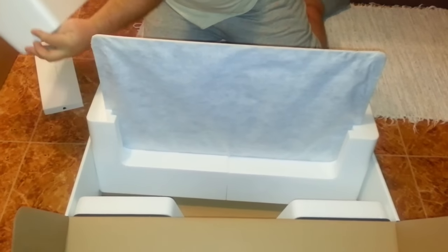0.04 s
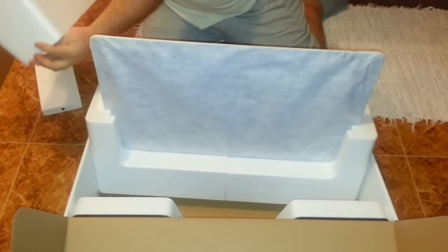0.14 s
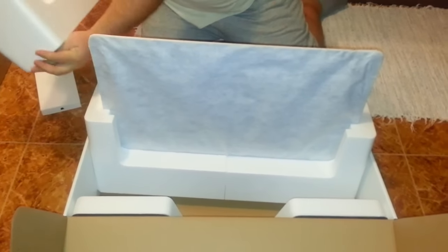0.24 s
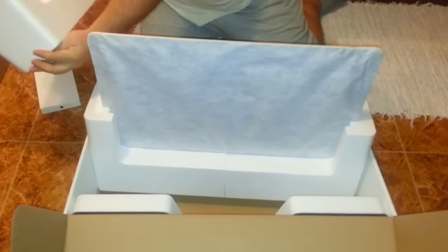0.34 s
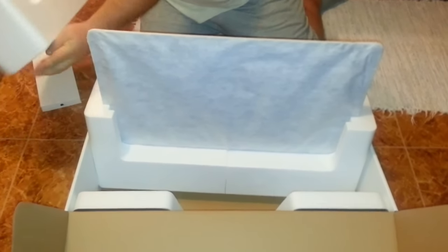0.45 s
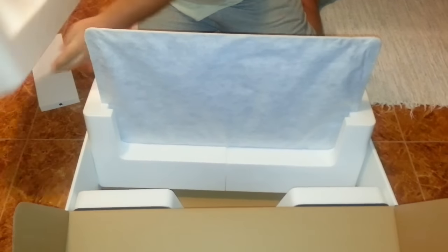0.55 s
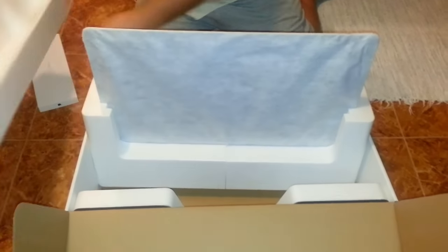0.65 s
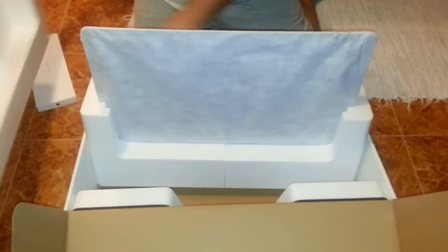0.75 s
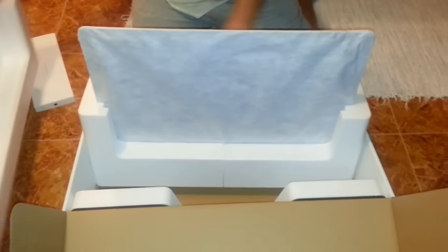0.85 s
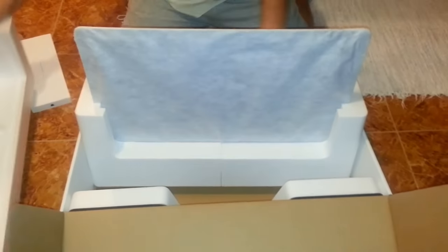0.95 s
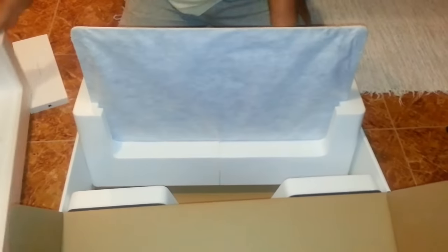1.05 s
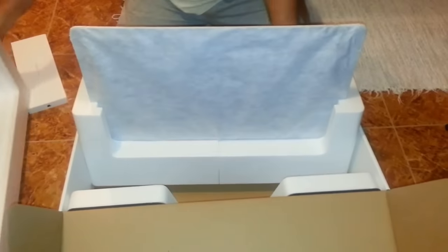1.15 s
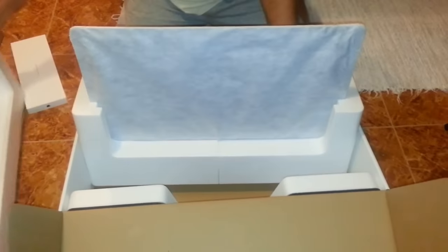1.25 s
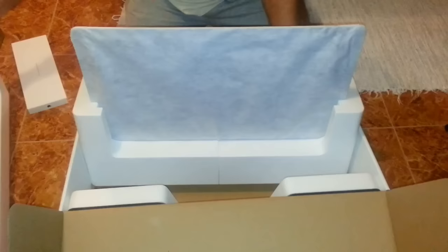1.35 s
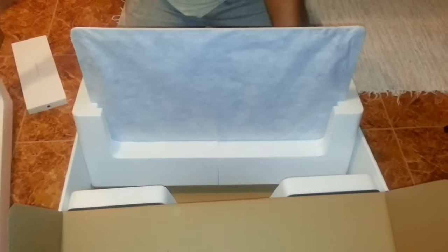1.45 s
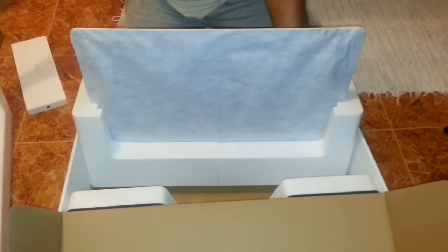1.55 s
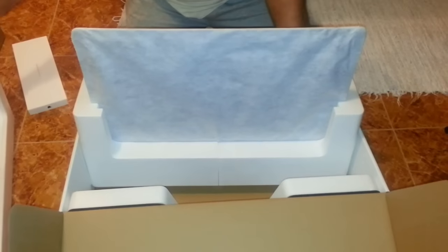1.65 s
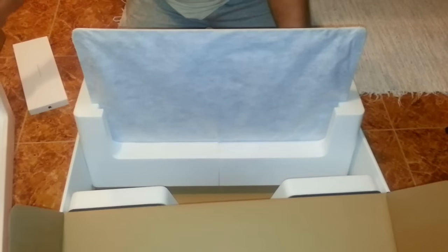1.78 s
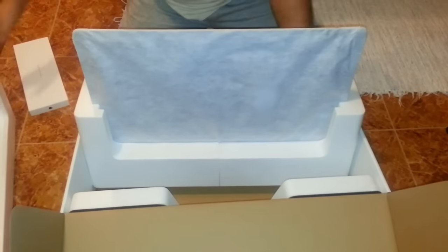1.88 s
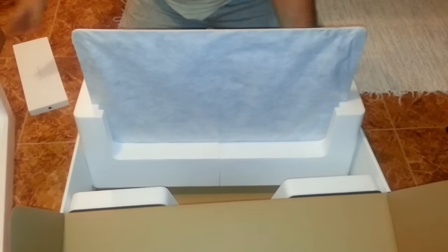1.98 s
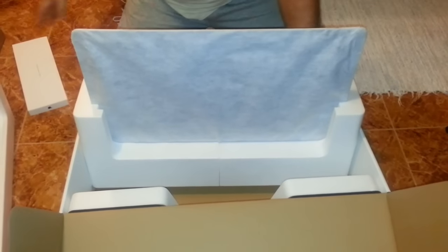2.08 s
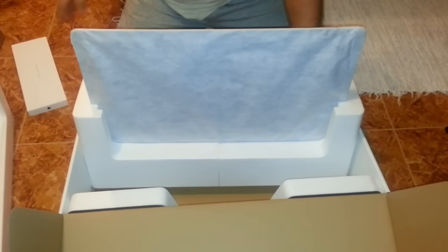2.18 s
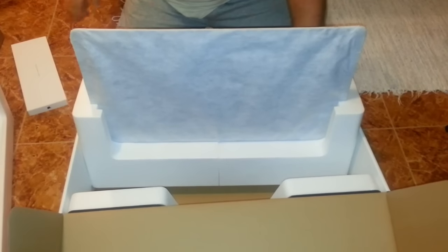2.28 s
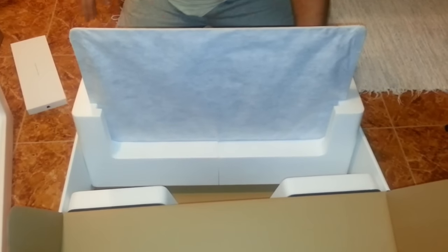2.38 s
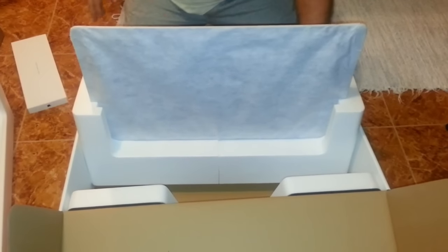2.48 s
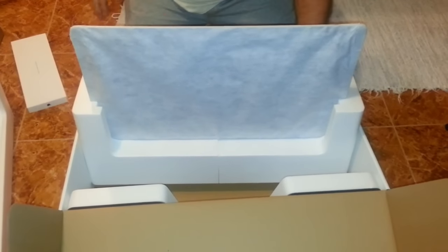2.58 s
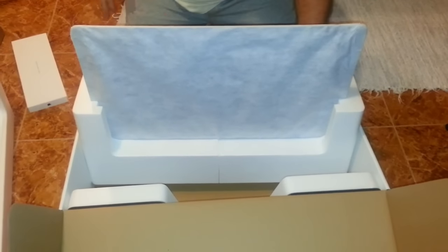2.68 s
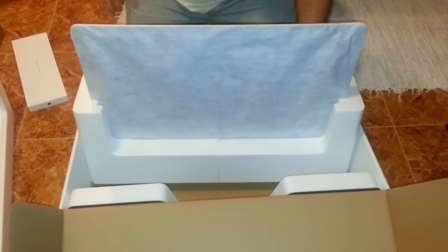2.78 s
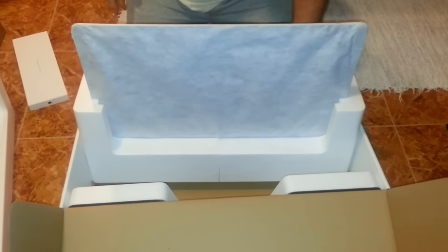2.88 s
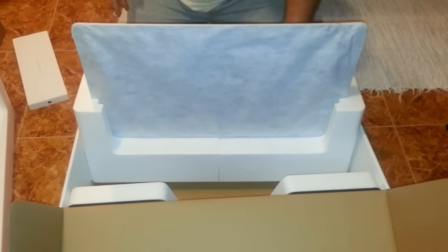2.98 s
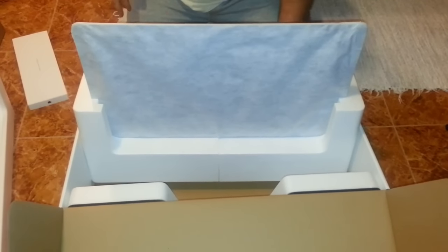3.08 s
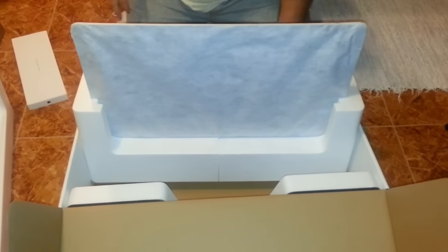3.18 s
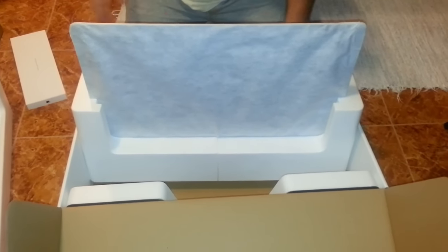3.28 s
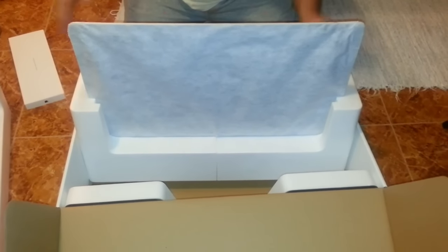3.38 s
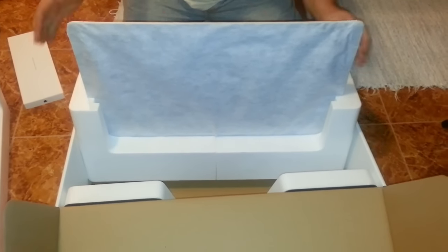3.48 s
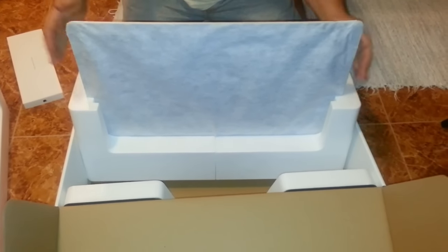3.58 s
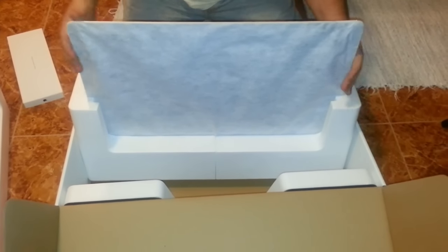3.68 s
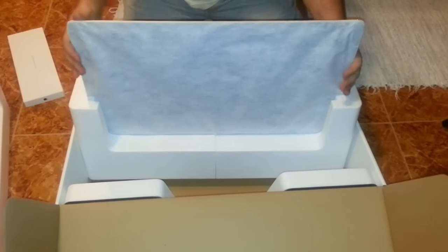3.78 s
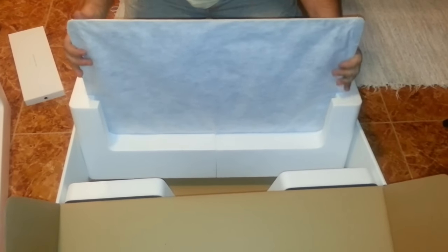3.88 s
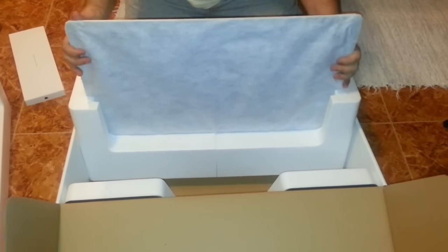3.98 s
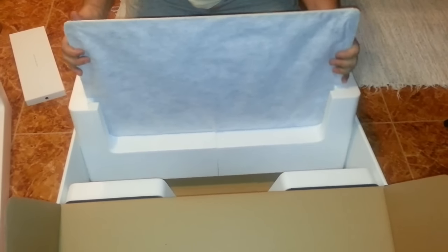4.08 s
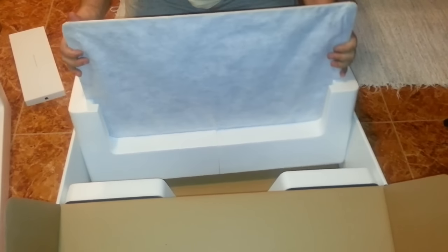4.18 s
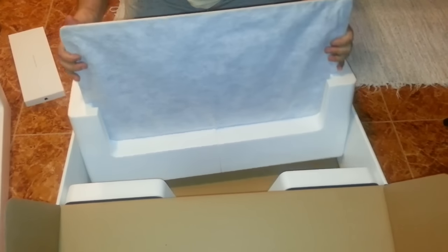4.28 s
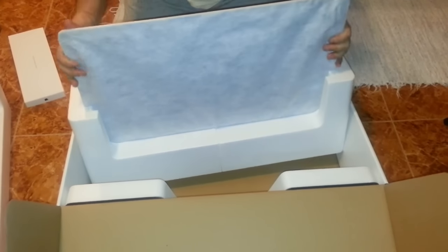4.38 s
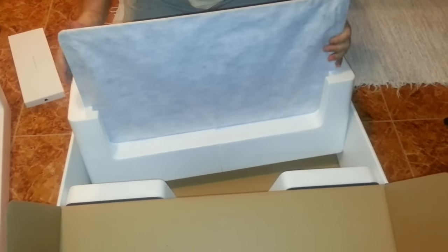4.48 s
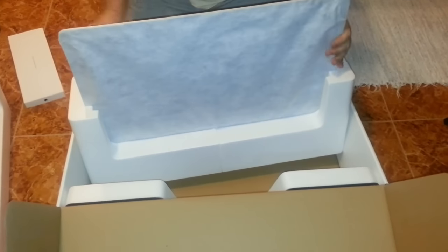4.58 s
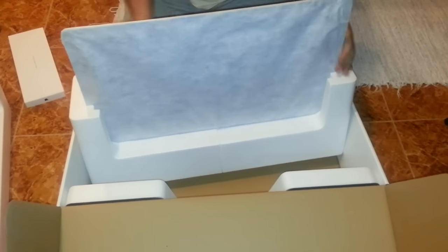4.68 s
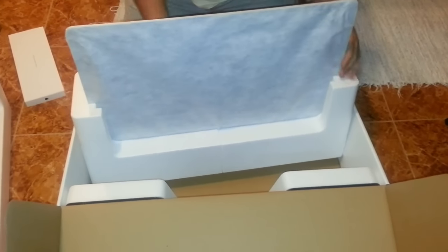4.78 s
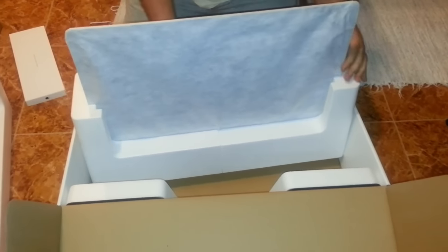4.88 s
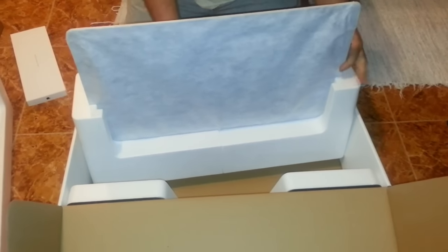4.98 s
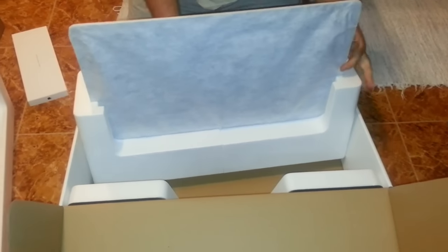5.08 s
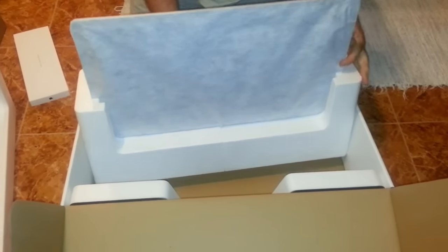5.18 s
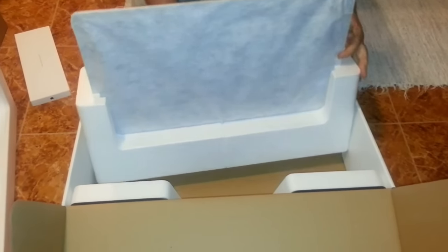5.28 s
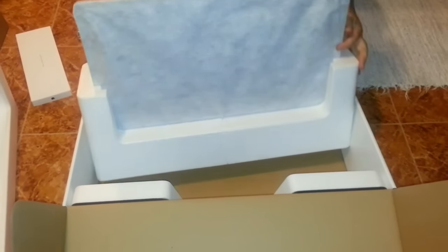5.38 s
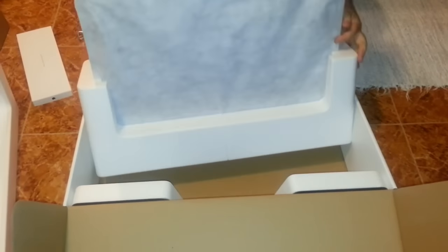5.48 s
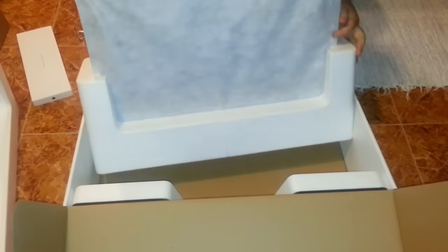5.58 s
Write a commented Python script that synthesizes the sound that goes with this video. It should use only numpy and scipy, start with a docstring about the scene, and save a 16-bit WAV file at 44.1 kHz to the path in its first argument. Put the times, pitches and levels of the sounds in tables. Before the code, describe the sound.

Close handling of packing foam indoors: soft skin scuffs, snapping crackles, a heavy low double knock and a few smaller bumps, then nearly three quiet seconds of light finger rustles and taps. Finally foam rubs on foam, rasping and squealing with two main rough pulls. Short hard-room reflections and a very faint steady background; the left channel is sharper, the right muffled.

```python
"""Unpacking foam from a cardboard box.

In a small tiled room a loose foam piece slides through the hands: scuffed grains over ringing modes.
It crackles in noise bursts and knocks hollowly as damped modes; fingers scrape, brush and tap.
Then the next piece is pulled up: grains drag through a resonant wall, and stick-slip harmonics squeal
and squeak. Reflections from the room and a faint steady background surround it."""
import sys
import numpy as np
from scipy import signal
from scipy.fft import rfft, irfft, next_fast_len
from scipy.io import wavfile
from scipy.ndimage import uniform_filter1d

SR = 44100
rng = np.random.default_rng(int(sys.argv[2]) if len(sys.argv) > 2 else 0)


def waveform_to_disk(signal):
    """Save audio, clipped to [-1, 1], as 16-bit WAV at the path in sys.argv[1]."""
    frames = np.transpose(np.atleast_2d(signal))
    scaled = np.clip(frames, -1, 1) * 32767
    samples = np.round(scaled).astype(np.int16)
    wavfile.write(sys.argv[1], SR, samples)


N = 248988
TIME = np.arange(N) / SR  # s


def amp(db):
    """Decibels to gain."""
    return 10 ** (np.asarray(db) / 20)


def unit(x):
    """Scales to rms 1."""
    return x / np.sqrt(np.mean(x ** 2) + 1e-20)


def read(points, hz):
    """Reads a table on a log-frequency axis."""
    f, value = np.transpose(points)
    return np.interp(np.log(hz + 1), np.log(f + 1), value)


def add(mix, start_s, sound):
    """Mixes a sound in at its start time."""
    part = mix[max(round(start_s * SR), 0):][:len(sound)]
    part += sound[:len(part)]


def play(source, rows):
    """Plays every row of a table."""
    mix = np.zeros(N)
    for row in rows:
        add(mix, *source(*row))
    return mix


def colour(x, points, size=4096):
    """Causal minimum-phase filter with the given spectrum."""
    log_gain = np.log(amp(read(points, abs(np.fft.fftfreq(size, 1 / SR)))))
    response = np.fft.ifft(np.exp(np.conj(signal.hilbert(log_gain)))).real
    return signal.oaconvolve(x, response[:size // 2])[:len(x)]


def wander(size, hz):
    """Random motion of rms 1, mostly slower than hz."""
    padded = next_fast_len(size)
    gain = 1 / (1 + (np.fft.rfftfreq(padded, 1 / SR) / hz) ** 4)
    noise = rng.standard_normal(padded)
    return unit(irfft(rfft(noise) * gain, padded)[:size])


def stroke(start_s, length_s, rise_s, sag_db, release_db_per_s=560.5):
    """Gain of one rubbing motion: it eases in, sags ever faster while it lasts, and is released."""
    t = np.maximum(TIME - start_s, 0)
    sag = sag_db * np.minimum(t / length_s, 1) ** 2
    release = release_db_per_s * np.maximum(t - length_s, 0)
    rise = np.sin(np.pi / 2 * np.minimum(t / rise_s, 1)) ** 1.7
    return rise * amp(sag - release)


def strokes(rows, axis):
    """Gain over time of a table of motions, at the levels in one column; overlaps add in power."""
    return np.sqrt(sum((stroke(*row[:4]) * amp(row[axis])) ** 2 for row in rows))


def grains(per_s, spread_db):
    """Foam beads let go one by one: clicks of random sign, a few of them large."""
    size = np.minimum(rng.exponential(1, N), 4)
    sign = rng.choice([-1, 1], N)
    return amp(spread_db * size) * sign * (rng.random(N) < per_s / SR)


# Modes of the hollow piece. Each row: frequency in Hz, relative level from a corner in dB,
# relative level from the long edge in dB, t60 in seconds at damping 1.
PIECE_MODES = [(142, -13.5, -9, 0.83), (179.4, -13, 0.5, .3), (218.4, -8.5, -14, .6),
               (249, -5, -11.5, 0.32), (288, -8, -4.5, 0.42), (343.5, -15, -9.5, 0.37), (393.6, 5, -9, .24),
               (455.4, -7.5, -16, 0.43), (533.2, -16, -5.5, .33), (587, -22.5, -15, 0.79),
               (624.5, -16, -20.5, 0.52), (763.5, -27.5, -22.5, 0.32)]


def ring(spot_hz, damping, edge, spot_db=5):
    """The piece's modes, excited at a spot from corner (0) to edge (1) and damped by the hand."""
    t, edge = np.arange(SR // 2) / SR, np.clip(edge, 0, 1)
    sound = np.zeros(len(t))
    for hz, corner_db, edge_db, t60_s in PIECE_MODES:
        contact_db = corner_db + edge * (edge_db - corner_db)
        off_spot_db = spot_db * np.log2(hz / spot_hz) ** 2
        decay_db = 60 * t * damping / t60_s
        sound += amp(contact_db - off_spot_db - decay_db) * np.sin(2 * np.pi * hz * t)
    return sound


# The loose piece slides through the hands. Each row: start in seconds, length in seconds,
# rise in seconds, sag in dB, relative scuff level in dB, relative hollow rumble level in dB.
SLIDES = [(0.0, 0.091, 0.00068, 4.5, -44.5, -55.5), (.085, 0.037, .008, -1.5, -38.5, -50),
          (.148, 0.12, 0.0079, -9.5, -41, -46.5), (.235, 0.17, 0.013, -3, -42.5, -65),
          (.405, 0.059, .03, 2, -47, -51), (.451, 0.095, .004, -8.5, -44, -54.5),
          (.62, 0.062, 0.022, -1, -63, -74), (.802, .18, 0.013, -4, -40.5, -49),
          (1.01, 0.073, 0.0043, -13, -39, -48), (1.115, 0.25, 0.004, -14, -41, -53.5),
          (1.33, 0.082, 0.024, 1.5, -46.5, -82), (1.39, 0.13, 0.0038, -3.5, -43, -49),
          (1.525, 0.095, 0.011, 2.5, -47.5, -52.5), (1.635, 0.047, .004, -7.5, -43, -44)]
# Spectrum of skin on foam. Each row: frequency in Hz, gain in dB.
SCUFF_SPECTRUM = [(100, -4), (700, 4.5), (1100, 7.5), (2000, 6.5), (4500, 2), (8000, -2), (11000, 5),
                  (15000, 1)]
# Spectrum of rubbing in the hollow piece. Each row: frequency in Hz, gain in dB.
RUMBLE_SPECTRUM = [(25, -21.5), (70, -8), (150, -9), (300, -0.5), (450, -3.5), (620, -8.5), (800, -11.5),
                   (1100, -12), (2500, -61.5)]


def slides():
    """Skin scuffs the loose piece in soft swells, and its hollow body rings along."""
    grip = unit(amp(1.2 * wander(N, 22)))
    scuff = amp(1.25) * unit(colour(grains(12000, 1.0), SCUFF_SPECTRUM)) * strokes(SLIDES, axis=4)
    bumps = grains(600, 4.5)
    modes = unit(signal.oaconvolve(bumps, ring(410, 2.6, 0.38))[:N])
    rumble = amp(1.5) * unit(colour(bumps, RUMBLE_SPECTRUM))
    body = amp(1.5) * (modes + rumble) * strokes(SLIDES, axis=5)
    return grip * (scuff + body)


# Short, coarse finger scrapes. Each row: start in seconds, relative level in dB,
# length in seconds, centre in Hz.
SCRAPES = [(0.081, -50, 0.029, 6850), (0.151, -44, 0.043, 1730), (0.465, -45.5, 0.029, 1260),
           (0.631, -63.5, 0.047, 6600), (1.533, -46, 0.04, 1430), (1.632, -41.5, 0.018, 2260),
           (1.913, -46.5, 0.052, 1570), (2.934, -54.5, 0.023, 2000), (3.117, -54, 0.066, 1576),
           (3.284, -66, 0.013, 1970)]


def scrape(start_s, db, length_s, hz, width_octaves=0.45):
    """A fingertip catches and skids: a handful of slips in one band."""
    size = round(length_s * SR)
    slips = rng.standard_normal(SR) * (rng.random(SR) < 1500 / SR)
    octaves = np.log2((np.fft.rfftfreq(SR, 1 / SR) + 1) / hz)
    band = np.exp(-(octaves / width_octaves) ** 2 / 2)
    skid = unit(irfft(rfft(slips) * band)[:size])
    return start_s, amp(db) * skid * signal.windows.tukey(size, .4)


# The hollow piece knocks on the floor. Each row: start in seconds, relative level in dB,
# pitch favoured by the struck spot in Hz, damping by the hand as a factor,
# contact from corner (0) to long edge (1).
KNOCKS = [(0.171, -32, 330, 2.2, 1), (0.545, -35.5, 300, 2.5, 0.72), (.803, -35.5, 310, 0.44, 0.48),
          (1.0093, 0.5, 255, 5.8, .05), (1.0188, 1, 390, 1.78, .02), (1.057, -9.5, 440, 2.14, 0.022),
          (1.119, -19.5, 397, 1.16, .05), (1.28, -30.5, 563, 1.4, 0.23), (1.395, -12.5, 300, 1.5, 0.89),
          (1.411, -18.5, 200, 3, .95), (1.424, -20, 330, 4.5, 0.55), (1.44, -15, 220, 4, 1),
          (1.453, -20.5, 170, 3, 1), (1.477, -19.5, 200, 4.8, 1), (1.541, -28, 450, 1.8, .9),
          (1.582, -29, 290, 2, 1), (1.598, -29, 260, 2.5, 1), (1.638, -19, 270, 3.3, 1),
          (1.648, -17.5, 225, 3.5, 0.43), (1.672, -22.5, 258, 3.8, .7), (1.931, -40.5, 159, 2.1, 1),
          (2.25, -44.5, 471, 1.83, 0.34)]
# Spectrum of the crushed edge. Each row: frequency in Hz, gain in dB.
THUD_SPECTRUM = [(25, -29), (90, -26), (150, -2.5), (400, 4.5), (600, -2.5), (800, -7.5), (1400, -11.5),
                 (2500, -30), (6000, -43)]


def knock(start_s, db, spot_hz, damping, edge, rise_s=0.0025):
    """A soft blow rings the hollow piece; the crushed edge adds a dull thud."""
    t = np.arange(SR // 2) / SR
    thud = unit(colour(rng.standard_normal(len(t)), THUD_SPECTRUM)) * np.exp(-t / .014)
    blow = amp(-4) * ring(spot_hz, damping, edge) + amp(-19) * thud
    return start_s, amp(db) * blow * (1 - np.exp(-t / rise_s))


# Beads snap in the foam. Each row: start in seconds, relative level in dB,
# brightness in dB per octave.
SNAPS = [(.363, -22.5, -2), (0.4523, -25.5, -5), (.816, -15, 3), (0.8321, -14.5, 2.5), (0.85, -18.5, -1),
         (0.884, -11, 2), (0.927, -15, -1.5), (1.0086, -19, -8.5), (1.018, -17, -10), (1.3957, -24.5, -5),
         (1.402, -18, 6), (1.584, -22, 1.5), (1.6381, -28.5, -7.5), (5.018, -23.5, -2.5)]


def snap(start_s, db, slope_db, decay_s=0.0033, size=2048):
    """A tiny decaying noise burst of cracking beads, tilted about 7 kHz."""
    t = np.arange(size) / SR
    burst = rng.standard_normal(size) * np.exp(-t / decay_s)
    shape = []
    for hz in (100, 400, 1500, 7000, 15000):
        tilt_db = slope_db * np.log2(max(hz, 1500) / 7000)
        shape.append((hz, tilt_db - 14 * (hz < 200)))
    return start_s, amp(db - 9) * colour(burst, shape)


# A hand lands on the packing and brushes along. Each row: start in seconds, length in seconds,
# rise in seconds, sag in dB, then relative levels in dB of hiss, rasp, hollow rumble and finger tap.
BRUSHES = [(1.838, 0.054, 0.0067, -3.5, -52.5, -47, -60, -41.5),
           (1.903, 0.061, 0.0054, -9, -61.5, -40.5, -50.5, -29.5),
           (2.097, 0.074, 0.0065, -2, -52.5, -52.5, -66.5, -34.5),
           (2.245, 0.032, 0.0056, -8, -84, -58, -52.5, -57.5),
           (2.312, 0.023, 0.014, -1, -73.5, -69.5, -75, -60.5),
           (2.419, 0.13, 0.0095, 4.5, -60.5, -61.5, -66, -29),
           (2.528, 0.12, 0.017, -6, -46, -51.5, -61.5, -35),
           (2.681, 0.17, 0.076, -5.5, -46, -55, -58, -60.5),
           (2.864, 0.23, 0.0078, 1.5, -53.5, -58.5, -65, -36),
           (3.102, 0.064, 0.034, -3.5, -65, -55, -61.5, -50),
           (3.218, 0.06, 0.029, 0.5, -64, -63.5, -66, -45),
           (3.276, 0.026, 0.019, -2.5, -58, -51, -58.5, -56),
           (3.352, 0.025, 0.019, -1.5, -76, -64.5, -69, -46.5),
           (3.694, 0.072, 0.01, -8.5, -55.5, -52, -54.5, -30.5),
           (3.84, 0.015, 0.0052, -8, -55, -37.5, -53, -32), (3.864, 0.04, 0.0046, 11, -54, -51, -73, -54),
           (3.9, .2, 0.015, -12, -31, -43.5, -91, -33), (4.168, 0.016, 0.0069, -9, -54, -45.5, -58, -38.5)]
# Spectrum of beads at the contact. Each row: frequency in Hz, gain in dB.
HISS_SPECTRUM = [(200, -9.5), (1200, -19), (2500, -8), (4500, -3), (8000, 2), (12000, 1), (15000, 6)]
# Spectrum of rasping foam. Each row: frequency in Hz, gain in dB.
RASP_SPECTRUM = [(200, -43), (900, -6), (1200, 3.5), (1500, 7), (2300, 8.5), (3500, 3), (5000, 0.5),
                 (9000, -5.5)]


def brushes():
    """Light hand strokes: beads hiss at the contact, rasp in the foam and rumble in the hollow."""
    beads, grip = grains(7000, 1.6), unit(amp(0.59 * wander(N, 38)))
    hiss = amp(-2.5) * unit(colour(beads, HISS_SPECTRUM)) * strokes(BRUSHES, axis=4)
    rasp = amp(-3.0) * unit(colour(beads, RASP_SPECTRUM)) * strokes(BRUSHES, axis=5)
    rumble = amp(-3.5) * unit(colour(beads, RUMBLE_SPECTRUM)) * strokes(BRUSHES, axis=6)
    return grip * (hiss + rasp + rumble)


def taps(slope_db=1.5):
    """In each brush the fingers tap the foam as they press home."""
    rows = [(start_s + rise_s, tap_db, slope_db) for start_s, _, rise_s, *_, tap_db in BRUSHES]
    return play(snap, rows)


# Rough stick-slip squeals, as gliding pitch curves; a squeal may use several. Each row of a curve:
# time in seconds, pitch in Hz, relative level in dB, unevenness as a share of the pitch.
SQUEAL_CURVES = [
    [(3.92, 13430, -40, 0.082), (3.96, 14300, -36, 0.058), (4.1, 13830, -55, 0.075)],
    [(4.27, 13010, -36, 0.11), (4.405, 14520, -12.5, 0.04), (4.425, 12150, -16.5, 0.061),
     (4.445, 8400, -27.5, 0.059), (4.465, 6800, -49, 0.15)],
    [(4.435, 2203, -42, 0.051), (4.453, 2472, -28.5, 0.068), (4.475, 1394, -43, 0.15)],
    [(4.57, 298, -50, 0.14), (4.612, 592, -46.5, 0.047), (4.64, 1270, -42, 0.053)],
    [(4.825, 6800, -24, .15), (4.845, 2500, -25, 0.11), (4.862, 1568, -29.5, 0.075),
     (4.9, 1487, -42, 0.074)],
    [(5.225, 7560, -58, 0.1), (5.262, 9740, -26, 0.046), (5.32, 9330, -56, 0.069)],
    [(5.185, 10400, -25, 0.079), (5.215, 13100, -19, 0.056), (5.25, 14700, -28, 0.041)],
    [(5.325, 7640, -41, 0.075), (5.36, 8570, -26.5, .15), (5.45, 10890, -22, 0.15),
     (5.55, 13450, -27, 0.22), (5.645, 13030, -31, 0.13)],
]


def squeal(rows, octave_db=-2.0, count=20):
    """Foam sticks and slips unevenly; the slips are sharp, so the gliding pitch has harmonics."""
    s, hz, db, uneven = np.transpose(rows)
    t = np.arange(s[0], s[-1], 1 / SR)
    jitter = np.interp(t, s, uneven) * wander(len(t), 700)
    pitch_hz = np.exp(np.interp(t, s, np.log(hz)) + jitter)
    phase = 2 * np.pi * np.cumsum(pitch_hz) / SR
    k = np.arange(1, count + 1)[:, None]
    below_nyquist = np.clip((SR / 2 - k * pitch_hz) / (SR / 10), 0, 1)
    weight = amp(octave_db * np.log2(k) - (k - 1) * pitch_hz / 2800) * below_nyquist
    wave = (weight * np.cos(k * phase)).sum(0) / np.sqrt((weight ** 2).sum(0) / 2 + 1e-9)
    wave *= unit(amp(2.75 * wander(len(t), 110)))  # the contact catches and lets go
    return s[0], wave * amp(np.interp(t, s, db)) * signal.windows.tukey(len(t), .02)


# Foam drags on foam. Each row: start in seconds, length in seconds, rise in seconds, sag in dB,
# relative drag level in dB, wall resonance at the start in Hz, its rise under load in Hz.
PULLS = [(4.239, 0.21, 0.063, 3.5, -22, 1970, 621.5), (4.492, 0.052, .02, 7, -51, 1400, 0),
         (4.557, 0.36, 0.03, -4, -16.5, 886, 1087), (4.915, 0.08, 0.018, -3.5, -36.5, 1400, -5),
         (5.014, 0.022, 0.0042, -1, -32, 1400, 0), (5.136, 0.49, 0.01, -8.5, -17, 1320, 999)]


def wall_hz(rest_hz=1460):
    """The load swells and eases once in each pull and bends the wall's lowest resonance with it."""
    hz = np.full(N, float(rest_hz))
    for start_s, length_s, *_, first_hz, load_hz in PULLS:
        u = (TIME - start_s) / length_s
        arch = first_hz + (rest_hz - first_hz) * u + load_hz * np.sin(np.pi * u)
        hz = np.where((u >= 0) & (u < 1), arch, hz)
    return hz


def wall(x, steep_db=21, skirt_hz=220, ridge_db=5, ridge_hz=130, patchy_db=4.5):
    """The wall rings at its lowest resonance and cuts below; shifting contacts favour passing bands."""
    hz, t, z = signal.stft(x, SR, nperseg=512, noverlap=384)
    tremor = np.exp(.08 * np.interp(t, TIME, wander(N, 14)))
    above_hz = hz[:, None] - np.interp(t, TIME, wall_hz()) * tremor
    spots = uniform_filter1d(rng.standard_normal(z.shape), size=3, axis=0)
    spots = unit(uniform_filter1d(spots, size=12, axis=1))
    skirt = steep_db * np.clip(above_hz / skirt_hz, -1, 0)
    ridge = ridge_db * np.exp(-(above_hz / ridge_hz) ** 2)
    gain = amp(skirt + ridge + patchy_db * spots)
    return unit(signal.istft(z * gain, SR, nperseg=512, noverlap=384)[1][:N])


# Foam catches and rasps as a pull starts or stalls. Each row: start in seconds, length in seconds,
# rise in seconds, sag in dB, relative level in dB.
CATCHES = [(4.435, 0.044, 0.028, 2.5, -32.5), (4.565, 0.083, 0.037, -4.5, -19.5),
           (4.69, 0.15, 0.018, 0, -31.5), (4.838, 0.033, 0.021, -2.5, -14.5),
           (5.143, 0.092, 0.0083, -10.5, -17)]


def pulls(rasp_share_db=-24):
    """Pressed foam drags in a fast judder and rasps where it catches, heard through the wall."""
    beads, grip = grains(9000, 2.5), unit(amp(2 * wander(N, 124)))
    drag = strokes(PULLS, axis=4)
    hiss = amp(-4.5) * wall(colour(beads, HISS_SPECTRUM)) * drag
    catching = strokes(CATCHES, axis=4) + amp(rasp_share_db) * drag
    rasp = amp(-8.0) * wall(colour(beads, RASP_SPECTRUM)) * catching
    return grip * (hiss + rasp)


# The lifted piece jostles in the box. Each row: start in seconds, relative level in dB.
JOSTLES = [(4.254, -56), (4.494, -47.5), (4.563, -50), (4.606, -67), (4.99, -50.5), (5.012, -49),
           (5.14, -45), (5.296, -45.5), (5.462, -45), (5.587, -44), (5.63, -56)]


def jostles(drag_share_db=-44, ring_db=-4, length_s=0.051, rise_s=0.0033, sag_db=-9.5):
    """The piece rumbles faintly while it is pulled, and rings hollowly when it nudges the box."""
    nudges = sum(amp(db) * stroke(start_s, length_s, rise_s, sag_db) for start_s, db in JOSTLES)
    level = amp(-5.5) * nudges + amp(drag_share_db) * strokes(PULLS, axis=4)
    bumps = level * unit(amp(2.7 * wander(N, 6.2))) * unit(grains(700, 1.3))
    dull = colour(bumps, RUMBLE_SPECTRUM)
    hollow = signal.oaconvolve(bumps, ring(260, 1.6, .5))[:N]
    return np.std(bumps) * (unit(dull) + amp(ring_db) * unit(hollow))


# Slips lock into clean squeaks under load. Each row: start in seconds, length in seconds,
# first pitch in Hz, settled pitch in Hz, settling time in seconds, relative level in dB, sag in dB.
SQUEAKS = [(4.603, 0.021, 566, 608, 0.01, -36.5, -12), (4.618, 0.023, 895, 954, .01, -39.5, -6),
           (4.628, 0.047, 1200, 1334, 0.0098, -28, -9), (4.652, 0.11, 1782, 2174, .014, -21, -11.5),
           (4.704, 0.027, 3050, 3304, 0.017, -24.5, 1), (4.728, 0.034, 3333, 3735, 0.0061, -25, -3.5),
           (4.752, 0.08, 5050, 5380, 0.012, -27.5, -18), (4.77, .04, 2090, 2206, 0.013, -32, -9),
           (5.149, .012, 1228, 1317, 0.0052, -27, -1.5), (5.161, 0.029, 1757, 2798, .008, -20, -4),
           (5.545, .1, 2055, 2134, 0.016, -50, -7)]


def squeak(start_s, length_s, first_hz, settled_hz, settle_s, db, sag_db, uneven_share=0.0066):
    """An almost even slip cycle that scoops up to its pitch."""
    t = np.arange(0, length_s, 1 / SR)
    pitch_hz = settled_hz + (first_hz - settled_hz) * np.exp(-t / settle_s)
    level_db = db + sag_db * t / length_s
    uneven = np.full(len(t), uneven_share)
    return squeal(np.column_stack([start_s + t, pitch_hz, level_db, uneven]))


# Decay of the room. Each row: frequency in Hz, t60 in seconds.
ROOM_T60 = [(150, 0.57), (500, 0.31), (2000, 0.37), (8000, 0.28), (15000, 0.33)]


def room(x, wet_db, gap_s=0.0033):
    """Direct sound plus dense reflections, independent at each microphone, at about equal power."""
    shape = (2, SR // 2)
    echoes = rng.standard_normal(shape) * (rng.random(shape) < .2)
    hz, t, z = signal.stft(echoes, SR, nperseg=256)
    tail = signal.istft(z * amp(-60 * t / read(ROOM_T60, hz)[:, None]), SR)[1]
    tail[:, :round(gap_s * SR)] = 0
    tail /= np.linalg.norm(tail, axis=1, keepdims=True)
    wet = amp(wet_db) * np.array([[1], [amp(10.5)]])  # the right side hears more of the room
    reflected = signal.fftconvolve(x[None], tail, axes=1)[:, :N]
    return (x + wet * reflected) / np.sqrt(1 + wet ** 2)


def from_left(pair, lag_s=0.00045):
    """Sound from the left reaches the right microphone later."""
    return np.array([pair[0], np.interp(TIME - lag_s, TIME, pair[1])])


# Spectrum of the steady background. Each row: frequency in Hz, gain in dB.
BACKGROUND_SPECTRUM = [(20, 17.5), (60, 8), (110, 4.5), (400, 1.5), (1000, -4), (2000, -11), (4000, -20),
                       (8000, -25), (15000, -16)]


def background():
    """Steady coloured noise, independent in each channel."""
    return np.array([unit(colour(rng.standard_normal(N), BACKGROUND_SPECTRUM)) for _ in range(2)])


def scene():
    """All the handling in the room, over a faint steady background."""
    knocks = room(play(knock, KNOCKS), wet_db=-22)
    loose_piece = from_left(room(slides(), wet_db=-4.5) + knocks)
    hands = room(brushes() + play(scrape, SCRAPES), wet_db=-10.5)
    next_piece = room(pulls() + jostles(), wet_db=-4.0)
    squeals = room(play(squeal, [[curve] for curve in SQUEAL_CURVES]), wet_db=-2)
    squeaks = room(play(squeak, SQUEAKS), wet_db=-5)
    snaps = room(play(snap, SNAPS) + taps(), wet_db=-3)
    return loose_piece + hands + next_piece + squeals + squeaks + snaps + amp(-75) * background()


# The left microphone has a ringing port. Each row: frequency in Hz, gain in dB.
LEFT_MIC = [(100, -6.5), (700, 3), (1300, 0), (2400, 2), (5000, 5.5), (6100, 11), (7000, 18), (7700, 20),
            (8500, 14), (10000, 5), (12000, -1), (14500, -5.5)]
# The right microphone faces away. Each row: frequency in Hz, gain in dB.
RIGHT_MIC = [(100, -11), (700, 2.5), (1300, -6.5), (2400, -7), (4400, -6), (6000, -3), (8000, -12),
             (10000, -15), (15000, -30)]


def record(dry, ceiling=0.68, edge_hz=14850):
    """Microphone colour, soft overload and the band limit."""
    heard = np.array([colour(dry[0], LEFT_MIC), colour(dry[1], RIGHT_MIC)])
    heard = heard / (1 + (heard / ceiling) ** 4) ** (1 / 4)
    low_pass = signal.firwin(301, edge_hz, window=("kaiser", 9), fs=SR)
    return signal.oaconvolve(heard, low_pass[None], "same", axes=1)


dry = scene()
out = record(dry)
waveform_to_disk(out)
```